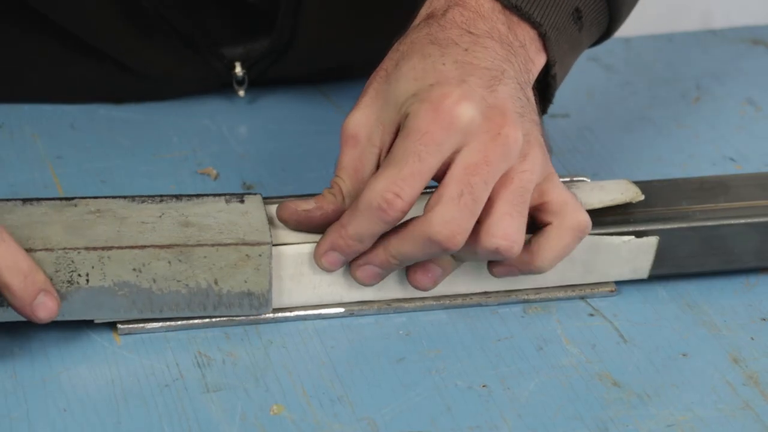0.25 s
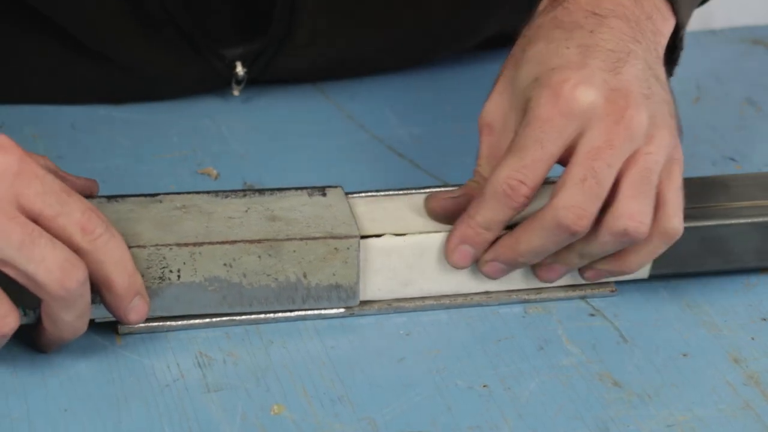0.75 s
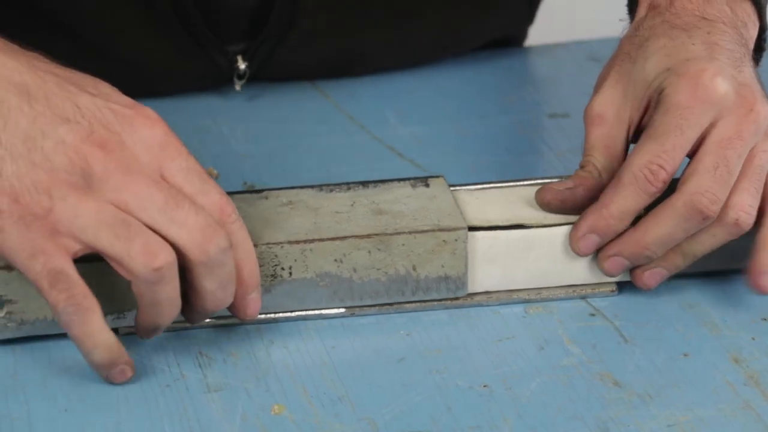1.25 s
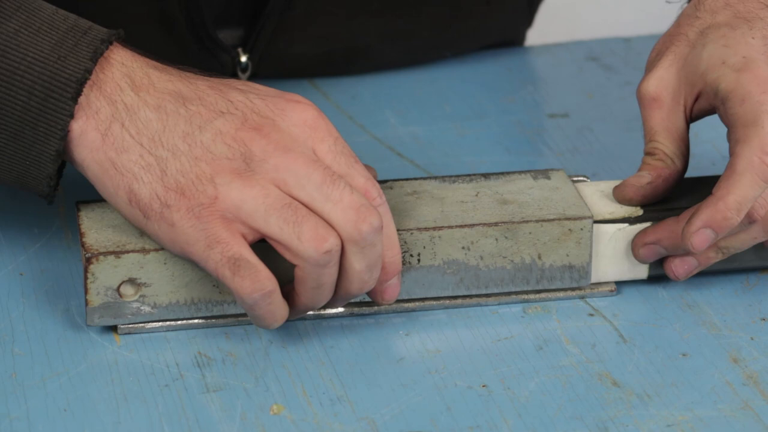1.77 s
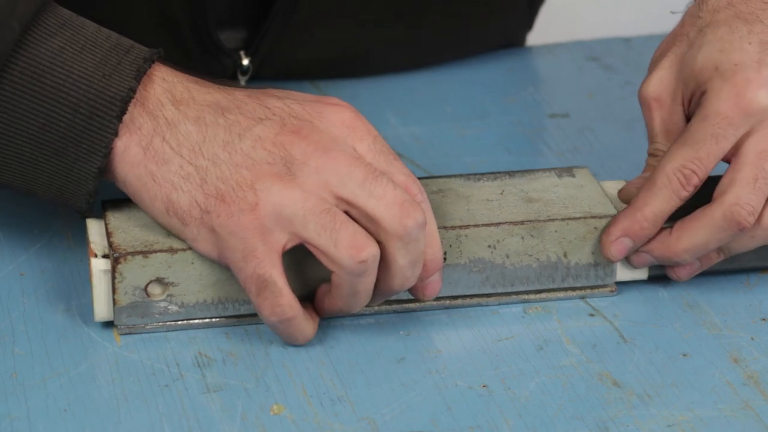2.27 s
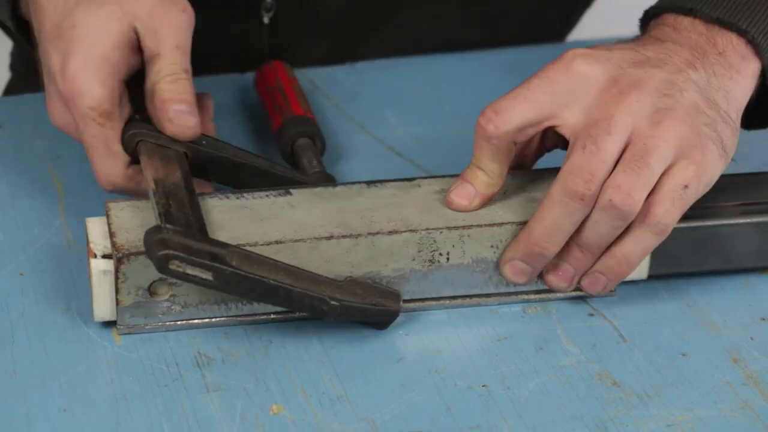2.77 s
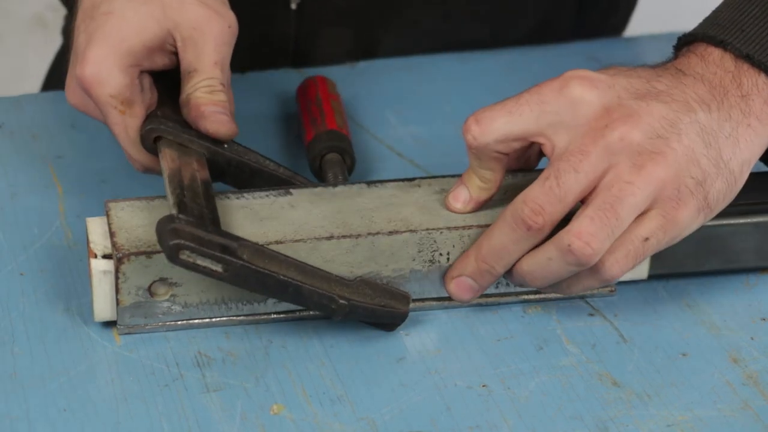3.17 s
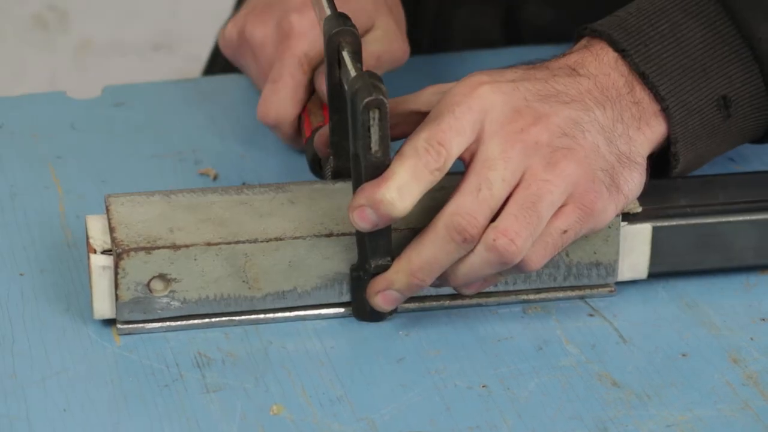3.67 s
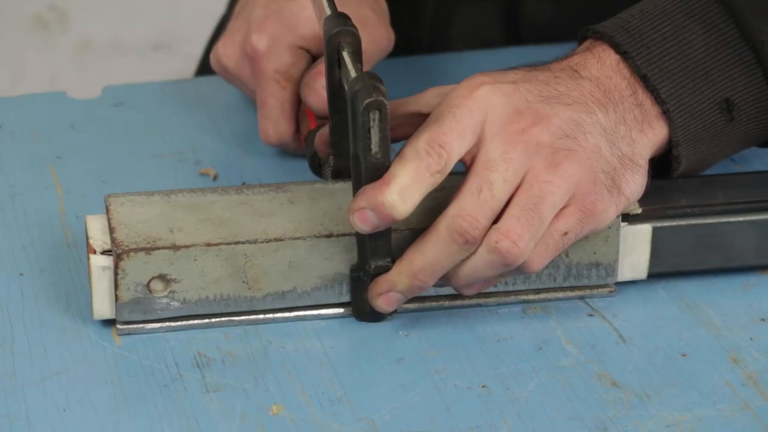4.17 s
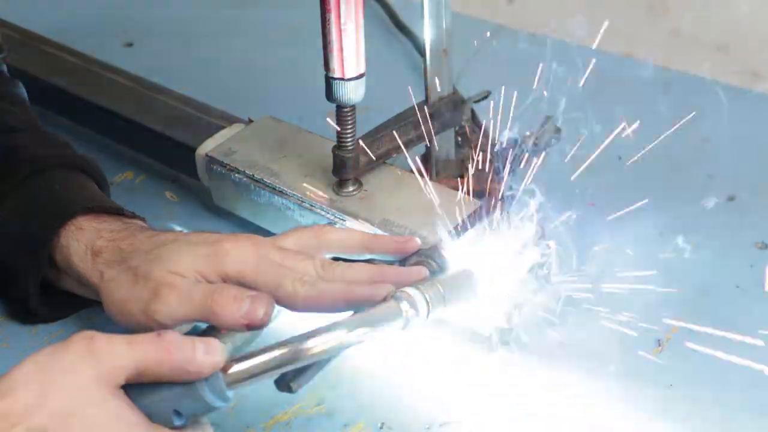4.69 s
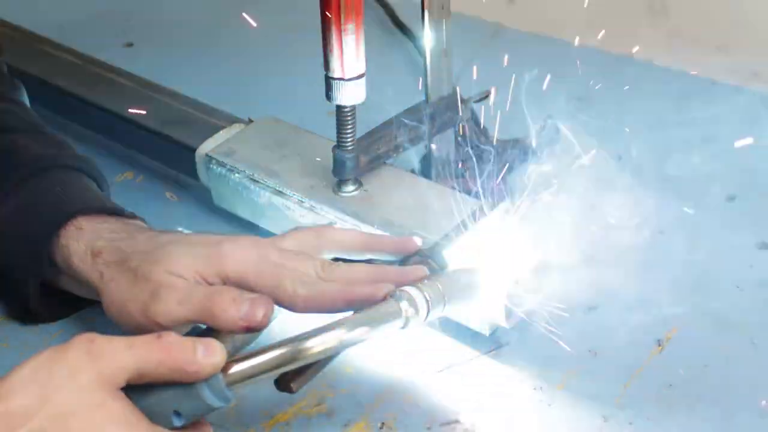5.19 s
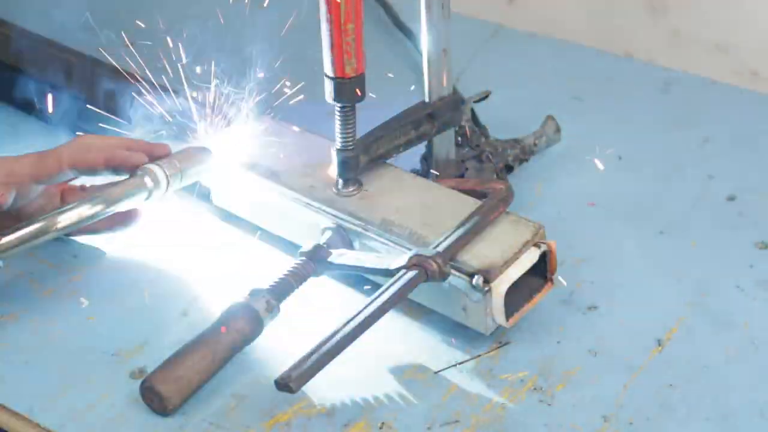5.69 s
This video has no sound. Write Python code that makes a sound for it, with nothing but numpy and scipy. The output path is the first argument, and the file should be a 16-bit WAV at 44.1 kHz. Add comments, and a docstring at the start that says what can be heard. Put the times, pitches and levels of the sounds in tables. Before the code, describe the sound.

A small, hard-walled workshop heard close to the bench, with faint room air and microphone hiss. From 0 s a square steel tube is shoved over a plastic-lined inner tube: a short scrape and soft plastic rubbing, a knock at 0.34, then a stronger juddering scrape at 0.5-0.75 with a rough squeal. Light touches near 0.93 lead to a hard hollow knock at 1.23, and groaning scrapes at 1.2-1.5, with a tiny high squeak. More scrapes at 1.6-1.8 shrink to faint nudges and knocks by 2.3. At 2.8-2.9 a clamp lands with a loud, dry cluster of clacks, another at 3.04, then screw rubbing and dull thuds at 3.15-3.6, softer rubbing at 3.8 and tiny ticks at 4.1-4.25. At 4.37 arc welding bursts in, rapid buzzing snaps and sizzle over a low whirr, popping at 4.58 and 5.26. At 5.33 a second, similar weld takes over and continues to 6 s.

```python
"""A small hard-walled workshop, camera microphone close to a wooden bench, quiet air and hiss throughout.
First a square steel tube is shoved over a plastic-lined inner tube: slips strike its modes, noise rubs.
Blows ring the steel from early on; the edge squeals, the tube groans and corners tink along the way.
Then a screw clamp is knocked on, as struck modes and dry clacks, and tightened, as grains of rubbing.
Last, two tack welds: trains of snaps, spit and sizzle over the whirr and hum of the wire feed."""
import sys
import numpy as np
from scipy import signal
from scipy.fft import rfft, irfft, next_fast_len
from scipy.io import wavfile
from scipy.ndimage import map_coordinates

SR = 44100
rng = np.random.default_rng(int(sys.argv[2]) if len(sys.argv) > 2 else 0)


def bounce(signal):
    """Save signal as a 16-bit WAV file at the path given by the first command-line argument."""
    frames = np.transpose(np.atleast_2d(signal))
    limited = np.clip(frames, -1, 1)
    pcm = np.round(limited * 32767).astype(np.int16)
    wavfile.write(sys.argv[1], SR, pcm)


N = 261954
TIME = np.arange(N) / SR  # seconds
TOP_HZ = 15800  # upper band limit of the camera


def amp(db):
    """Decibels to gain."""
    return 10 ** (np.asarray(db) / 20)


def unit(x):
    """Scale to rms 1."""
    return x / np.sqrt(np.mean(x ** 2) + 1e-20)


def along(points, hz):
    """(Hz, value) points read on a log frequency axis."""
    f, v = np.transpose(points)
    return np.interp(np.log(hz + 1), np.log(f + 1), v)


def during(start, end):
    """1 between two times, with 1 ms edges."""
    return np.clip(np.minimum(TIME - start, end - TIME) * 1000, 0, 1)


def stroke(start, rise, hold, fall):
    """A push builds up, holds, then dies away at fall dB a second."""
    t = TIME - start
    return np.clip(t / max(rise, 1e-3), 0, 1) * amp(-fall * np.maximum(t - rise - hold, 0))


def wobble(rate):
    """A smooth random curve, rate knots a second."""
    return map_coordinates(rng.standard_normal(int(N * rate / SR) + 4), [TIME * rate])


def filtered(x, response):
    """x times a response of frequency."""
    size = x.shape[-1]
    m = next_fast_len(size + 8192)
    return irfft(rfft(x, m) * response(np.fft.rfftfreq(m, 1 / SR)), m)[..., :size]


def convolved(x, response):
    """x through an impulse response."""
    return signal.fftconvolve(x, response)[:N]


def coloured(x, spectrum, size=4096):
    """x through a causal, minimum-phase filter with the given (Hz, dB) shape."""
    shape_db = np.maximum(along(spectrum, np.fft.rfftfreq(size, 1 / SR)), -100)
    cepstrum = irfft(np.log(amp(shape_db)))
    # folding the cepstrum forward in time makes the filter causal
    cepstrum[1:size // 2] *= 2
    cepstrum[size // 2 + 1:] = 0
    return signal.fftconvolve(x, irfft(np.exp(rfft(cepstrum))))[:len(x)]


def band(x, low_hz, high_hz):
    """Causal band-pass."""
    edges = [low_hz, min(high_hz, SR / 2 - 1)]
    return signal.sosfilt(signal.butter(3, edges, 'band', fs=SR, output='sos'), x)


def noise(spectrum):
    """Shaped noise of rms 1."""
    return unit(coloured(rng.standard_normal(N), spectrum))


def pulses(rate, scatter, spread_db, count=6000):
    """Pulses of uneven size and spacing, rate a second, of rms 1."""
    draws = rng.standard_normal((count, 2))
    gaps = np.exp(scatter * draws[:, 0] - scatter ** 2 / 2)  # in mean intervals
    clock = np.cumsum(rate * np.ones(N)) / SR
    at = np.searchsorted(clock, np.cumsum(gaps))
    sizes = amp(spread_db * np.clip(draws[:, 1], -2, 2))
    return unit(np.bincount(at, sizes, N + 1)[:N])


def shifting(x, draw, size=16384, fade='hann'):
    """x through a response drawn afresh every half window, as contacts and paths move."""
    padded, out = np.pad(x, (size // 2, size)), np.zeros(N + 2 * size + 2 * SR)
    window = signal.get_window(fade, size)
    for start in range(0, N + size // 2, size // 2):
        piece = padded[start:start + size] * window
        if piece.any():
            piece = signal.fftconvolve(piece, draw())
            out[start:start + len(piece)] += piece
    return out[size // 2:][:N]


def strike(out, s, x):
    """Add a short sound to out at s seconds."""
    out[round(s * SR):][:len(x)] += x


def cloud(spectrum, t60):
    """A contact's dense, quickly dying overtones, of energy 1."""
    t = np.arange(SR // 4) / SR
    x = coloured(rng.standard_normal(len(t)) * amp(-60 * t / t60), spectrum)
    return x / np.linalg.norm(x)


def ring(modes):
    """Long modes struck once, each with a random sign and about 1 dB of scatter, of energy 1."""
    t = np.arange(SR * 3 // 4) / SR
    x = np.zeros(len(t))
    for hz, db, t60 in modes:
        decay = amp(db + rng.normal(0, 1) - 60 * t / t60) / np.sqrt(t60)
        x += decay * np.sin(2 * np.pi * hz * t) * rng.choice([-1, 1])
    return x / np.linalg.norm(x)


def body(overtones, modes, low_hz, high_hz):
    """One register of a contact: overtones plus long modes, of energy 1."""
    x = band(np.pad(overtones, (0, len(modes) - len(overtones))) + modes, low_hz, high_hz)
    return x / np.linalg.norm(x)


# Likeness of left and right in the diffuse field. Each row: frequency in Hz, likeness from 0 to 1.
LIKENESS = [(100, 1), (2500, 0.97), (4500, 0.92), (8000, 0.33), (14000, 0.3)]


def diffuse(a, b):
    """Two unrelated signals as one diffuse field: alike in the bass, apart in the treble."""
    turn = lambda hz: np.arccos(np.clip(along(LIKENESS, hz), -1, 1)) / 2
    mid = filtered(a, lambda hz: np.cos(turn(hz)))
    side = filtered(b, lambda hz: np.sin(turn(hz)))
    return np.array([mid + side, mid - side])


# Decay of the workshop's tail. Each row: frequency in Hz, t60 in seconds.
ROOM_DECAY = [(150, 1), (500, 1), (2000, 0.68), (6000, 0.91), (14000, 0.19)]


def workshop(x, early_db, tail_db, early_t60):
    """Early reflections from bench and walls, then a tail that dies sooner in the treble."""
    hz, t, _ = signal.stft(np.zeros(SR * 3 // 4), SR, nperseg=256)
    fading = amp(-60 * t / along(ROOM_DECAY, hz)[:, None])

    def answer():
        cells = np.fft.rfft(rng.standard_normal((256, len(t))), axis=0)
        tail = signal.istft(cells * fading, nperseg=256)[1]
        early_decay = amp(-60 * np.arange(len(tail)) / SR / early_t60)
        early = rng.standard_normal(len(tail)) * early_decay
        return (amp(early_db) * unit(early) + amp(tail_db) * unit(tail)) / np.sqrt(len(tail))
    return diffuse(shifting(x, answer, fade='cosine'), shifting(x, answer, fade='cosine'))


# Phase between the microphone ports. Each row: frequency in Hz, lead of the right port in radians.
PORT_LEAD = [(5000, 0), (9000, 1.89), (12000, 2.5), (15000, 3.5)]


def placed(x):
    """The two microphone ports hear direct sound alike in the bass and out of step in the treble."""
    sides = np.array([[-1], [1]])
    return filtered(x, lambda hz: np.exp(.5j * along(PORT_LEAD, hz) * sides))


# Spectrum of the quiet room. Each row: frequency in Hz, level in dB (shape only).
AIR = [(25, -17), (70, -11), (105, 2), (150, -1.5), (600, -1.5), (2400, -23), (15000, -33)]


def room_air():
    """The quiet air of the room, as diffuse shaped noise."""
    return amp(-50.5) * diffuse(noise(AIR), noise(AIR))


# Spectrum of the microphone's own noise. Each row: frequency in Hz, level in dB (shape only).
MIC_HISS = [(100, -4), (600, 7), (3000, -4.5), (15000, -22)]


def mic_hiss():
    """The microphone's own hiss, independent in each channel."""
    return amp(-53.5) * np.array([noise(MIC_HISS), noise(MIC_HISS)])


# Ringing modes of the steel tube. Each row: frequency in Hz, relative level in dB, t60 in seconds.
TUBE_MODES = [(206.5, -11, 0.35), (293.6, -11, 0.52), (311.8, -4, 0.47), (443, -12.5, 0.51),
              (568, -6.5, 0.24), (613, -2, 0.5), (708, -7, 0.13), (749.5, -1.5, 0.086), (795, -6.5, 0.38),
              (1025, -8.5, 0.62), (1100, -9.5, 0.23), (1700, -17, 0.45), (2780, -15, 0.098)]
# Dense scraping overtones of tube and bench. Each row: frequency in Hz, level in dB (shape only).
SCRAPE = [(88, -81), (165, -26), (300, -14), (420, -12), (630, -5), (950, -9.5), (1100, -7), (1350, -15.5),
          (1580, -17.5), (1830, -17), (2300, -23.5), (2800, -27.5), (3700, -34), (4700, -41.5),
          (15000, -60.5)]
# Shoves of the tube. Each row: start in seconds, rise in seconds, hold in seconds, judder drive in dB,
# drive of the steel edge's rasp in dB over the judder, drive of the bench rumble in dB over the judder.
SHOVES = [(0, 0.00051, 0.009, -16.5, -5.5, -2.5), (0.517, 0.016, 0.071, -14.5, -5.5, -9),
          (0.646, 0.0071, 0.0075, -18.5, -5, -7), (1.217, 0.019, 0.05, -18, -6, -3.5),
          (1.366, 0.018, 0.052, -15.5, -3, -10), (1.608, 0.012, 0.027, -23.5, -12, -14),
          (1.679, 0.11, 0.0091, -15, -5, -9), (1.92, 0.02, 0.029, -25, -6, -11.5),
          (2.114, 0.02, 0.0081, -32, -3, -6), (2.249, 0.0029, 0.0039, -41, 5.5, -11.5)]
# Singing of the scraping edge, at little overlap and then deep over the inner tube.
# Each row: frequency in Hz, width in Hz, relative level in dB.
EDGE_SHALLOW = [(1868, 123, 2), (2630, 100, -7.5), (3017, 82, -5.5), (4560, 174, -9), (6500, 67, -15.5),
                (7700, 74, -32)]
EDGE_DEEP = [(1852, 53, 6), (1987, 130, 5), (2293, 55, -3.5), (2613, 77, -6), (4240, 120, -19.5)]
DEEP_FROM_S = 1.1  # shoves from here on sing with the deep set
# dying away after a shove, in dB per second
RUMBLE_FALL, JUDDER_FALL, RASP_FALL, HISS_FALL = 52.4, 92, 159, 350


def edge(x, modes):
    """x through the short resonances of the steel edge, of rms 1."""
    return unit(sum(amp(db) * signal.lfilter(*signal.iirpeak(hz, hz / width, SR), x)
                    for hz, width, db in modes))


def slide():
    """Stick and slip: small slips strike the tube in each shove; brighter registers fade sooner.

    The edge finds other resonances as the tubes overlap further."""
    def effort(levels_db, fall):
        return np.max([amp(db) * stroke(*shove[:3], fall) for db, shove in zip(levels_db, SHOVES)], axis=0)

    def register(level, ring_db, low_hz, high_hz):
        struck = slips * level * (level > amp(-90))
        contact = lambda: body(cloud(SCRAPE, t60=0.042), amp(ring_db) * modes, low_hz, high_hz)
        return shifting(struck, contact, size=4096)

    *_, judder_db, rasp_over_db, bench_over_db = np.transpose(SHOVES)
    rasp_db = judder_db + rasp_over_db
    slips, modes = pulses(rate=380, scatter=.5, spread_db=1.5), ring(TUBE_MODES)
    bench = register(effort(judder_db + bench_over_db, RUMBLE_FALL), ring_db=4.0, low_hz=217.0, high_hz=486)
    judder = register(effort(judder_db, JUDDER_FALL), ring_db=-4.0, low_hz=423, high_hz=1320)
    rasp = amp(-4.0) * register(effort(rasp_db, RASP_FALL), ring_db=1.5, low_hz=1490, high_hz=5500)

    catches = pulses(rate=300, scatter=.5, spread_db=2.0) * rng.choice([-1, 1], N)
    shallow, deep = edge(catches, EDGE_SHALLOW), edge(catches, EDGE_DEEP)
    sing = np.zeros(N)
    for db, shove in zip(rasp_db, SHOVES):
        tone = shallow if shove[0] < DEEP_FROM_S else deep
        sing += amp(db) * stroke(*shove[:3], RASP_FALL) * tone

    flicker = amp(-14 + 0.77 * wobble(150))
    hiss = flicker * unit(band(noise(SCRAPE), 3600, TOP_HZ)) * effort(rasp_db, HISS_FALL)
    return bench + judder + rasp + amp(-3.5) * sing + hiss


# Strokes of the plastic liner and of the hands on it.
# Each row: start in seconds, hold in seconds, level of the hiss in dB.
RUBS = [(0, 0.13, -42.5), (0.198, 0.15, -47), (0.707, 0.081, -42.5), (0.93, 0.035, -41),
        (1.155, 0.061, -40)]
RUB_RISE_S, RUB_FALL = 0.0074, 50  # seconds, dB per second


def liner():
    """The plastic liner rubs with a fine, uneven hiss and stirs the tube a little."""
    level = np.max([amp(db) * stroke(s, RUB_RISE_S, hold, RUB_FALL) for s, hold, db in RUBS], axis=0)
    hiss = unit(band(noise(SCRAPE), 4950, TOP_HZ))
    tube = unit(band(noise(SCRAPE), 1700, 5200))
    return (hiss + amp(-3.0) * tube) * level * amp(1.9 * wobble(88.8))


# Steel knocking on steel and bench. Each row: time in seconds, blow in dB before a common lift,
# thud in dB within the blow, clink in dB within the blow.
KNOCKS = [(0.344, -11, -4, -19.5), (0.937, -23, 6.5, -8), (1.227, -7.5, -9.5, -29), (2.132, -20.5, -3, -15),
          (2.261, -18, -4, -14), (2.666, -24, -2, -35), (2.812, -9, -1.5, -15), (2.849, -6, -5.5, -29),
          (2.883, -7, -5, -35), (3.036, -13.5, -2, -15.5), (3.233, -15.5, -2.5, -11),
          (4.087, -23.5, -3, -31), (4.136, -29.5, -1.5, -2), (4.245, -28, -22, -8)]
# Overtones of a knock. Each row: frequency in Hz, level in dB (shape only).
KNOCK = [(100, -9), (150, -29.5), (220, -8.5), (360, 1.5), (480, -2), (750, 2.5), (1200, -4), (1700, -13),
         (3200, -17.5), (5400, -24.5), (15000, -37)]


def knocks():
    """Each blow thuds in the bench and rings the steel, with its own share of thud, clank and clink."""
    out, modes = np.zeros(N + SR), amp(-5.0) * ring(TUBE_MODES)
    for s, db, thud_db, clink_db in KNOCKS:
        overtones = cloud(KNOCK, t60=0.13)
        thud = amp(thud_db) * body(overtones, modes, 110.0, 374)
        # the clank takes the energy that the thud leaves
        clank_gain = np.sqrt(np.clip(1 - amp(thud_db) ** 2, .05, 1))
        clank = clank_gain * body(overtones, modes, 512, 1840)
        clink = amp(clink_db) * body(overtones, modes, 1750, 11600)
        strike(out, s, amp(db + 14.5) * (thud + clank + clink))
    return out[:N]


# Squeals of the edge. Each row: start in seconds, hold in seconds, frequency in Hz,
# level in dB before roughening.
SQUEALS = [(0.653, 0.07, 1855, -34.5), (1.372, 0.02, 5620, -36.5)]


def squeals():
    """For a moment the edge catches and squeals on one note, rough in phase and level."""
    out = np.zeros(N)
    for s, hold, hz, db in SQUEALS:
        note = np.sin(2 * np.pi * hz * TIME + wobble(170)) * amp(4.9 * wobble(180))
        out += amp(db) * stroke(s, RUB_RISE_S, hold, RASP_FALL) * note
    return out


# Pushes or blows that set the tube groaning. Each row: start in seconds, hold in seconds, drive in dB.
GROANS = [(0.923, 0.02, -28), (1.247, 0.07, -20.5), (1.38, 0.1, -17), (2.84, 0.031, -28)]
# Bending modes of the tube that groan. Each row: frequency in Hz, relative level in dB.
BENDING_MODES = [(569, -7.5), (609, 0.5)]
GROAN_FALL = 150  # dB per second


def groan():
    """The tube's bending modes groan unevenly while they are driven."""
    level = sum(amp(db) * stroke(s, RUB_RISE_S, hold, GROAN_FALL) for s, hold, db in GROANS)
    tones = np.zeros(N)
    for hz, db in BENDING_MODES:
        tones += amp(db + 2.4 * wobble(70)) * np.sin(2 * np.pi * hz * TIME + 0.66 * wobble(44.55))
    return level * tones


# Light touches of steel. Each row: time in seconds, pitch in Hz, energy in dB.
TINKS = [(0.934, 2450, -14), (2.851, 5300, -17), (4.246, 3900, -25.5)]
TINK_T60_S, TINK_SPREAD = 0.028, 0.08  # seconds, reach of the band each side as a share of the pitch


def tinks():
    """Steel corners touch with a tiny, bright ring, made of narrow decaying noise."""
    out, t = np.zeros(N + SR), np.arange(SR // 10) / SR
    for s, hz, db in TINKS:
        burst = rng.standard_normal(len(t)) * amp(-60 * t / TINK_T60_S)
        tink = band(burst, hz / (1 + TINK_SPREAD), hz * (1 + TINK_SPREAD))
        strike(out, s, amp(db) * tink / np.linalg.norm(tink))
    return out[:N]


# Clacks of the clamp's jaw and sliding arm. Each row: time in seconds, energy in dB.
CLACKS = [(2.8133, 4), (2.8205, 5), (2.850, -1), (2.874, -12), (2.885, 4), (2.912, -13), (3.041, -7.5),
          (4.088, -31), (4.247, -22)]
# First instant of a hard contact. Each row: frequency in Hz, level in dB (shape only).
CRACK = [(200, -32), (900, 4.5), (1700, 9), (2800, -7), (5300, -21.5), (15000, -41.5)]
# Dull thuds of the hands striking the clamp. Each row: time in seconds, energy in dB before a band-pass.
THUDS = [(3.233, -4), (3.462, -2.5), (3.506, -3.5), (3.56, -8.5)]
# Modes of clamp and tube together. Each row: frequency in Hz, relative level in dB, t60 in seconds.
CLAMP_MODES = [(295.4, 0.5, 0.18), (336, -1, 0.048), (365, -2.5, 0.17), (451, -9, 0.096)]


def clamp():
    """The clamp lands and rattles with dry clacks; hands strike it with soft, ringing thuds."""
    out = np.zeros(N + SR)
    for s, db in CLACKS:
        strike(out, s, amp(db) * cloud(CRACK, t60=0.019))
    for s, db in THUDS:
        strike(out, s, amp(db) * band(ring(CLAMP_MODES), 97, 980))
    return out[:N]


# Hands bearing down on the clamp. One row: start in seconds, hold in seconds, bench rumble in dB.
GRIP = (2.97, 0.86, -48)
# Turns of the clamp screw. Each row: start in seconds, hold in seconds, level in dB.
TURNS = [(3.155, 0.042, -44.5), (3.775, 0.13, -49)]
# Overtones of the rubbing thread. Each row: frequency in Hz, level in dB (shape only).
THREAD = [(150, -62), (600, 18), (1000, 10.5), (2000, -2.5), (6000, -12), (15000, -36)]
TURN_RISE_S, TURN_FALL = 0.011, 26  # seconds, dB per second


def screw():
    """The clamp's thread rubs in small grains at each turn; the bench rumbles under the hands."""
    push = lambda s, hold, db: amp(db) * stroke(s, TURN_RISE_S, hold, TURN_FALL)
    grains = pulses(rate=720, scatter=0.99, spread_db=4.5)
    turning = grains * sum(push(*turn) for turn in TURNS)
    rub = shifting(turning, lambda: cloud(THREAD, t60=0.033), size=4096)
    bench = lambda: body(cloud(KNOCK, t60=0.14), amp(15.0) * ring(TUBE_MODES), 297, 406)
    rumble = shifting(grains * push(*GRIP), bench, size=4096)
    return rub + rumble


# Strength of the arc. Each row: time in seconds, gain in dB.
HEAT = [(4.73, -4), (4.79, -0.2), (5.36, -2), (5.68, 2.5)]


def burning(start, end):
    """Strength of one arc, which rises once the pool has melted and follows the heat curve."""
    return during(start, end) * amp(np.interp(TIME, *np.transpose(HEAT)))


# Tack welds. Each row: arc struck in seconds, arc out in seconds, crackle in dB before the heat,
# wire feed in dB before the heat, short circuits a second.
TACKS = [(4.371, 5.333, -25, -35, 185), (5.332, 6.0, -27, -32, 195)]
# Spectra of the two crackles. Each row: frequency in Hz, level in dB (shape only).
FIRST_TACK = [(100, -30), (500, -8), (1450, -12), (2200, -7), (2900, -18), (4000, -12.5), (5200, -12.5),
              (6400, -7.5), (8200, -13.5), (12500, -9.5), (15000, -18)]
SECOND_TACK = [(100, -59), (500, -4), (1400, -3.5), (2200, 1), (3200, -4.5), (5200, -5.5), (8200, -8),
               (11700, -5), (15000, -10)]
# Loudest bursts of spatter. Each row: time in seconds, level in dB over an ordinary snap.
POPS = [(4.58, 8), (5.2635, 7.5)]
SPIT_T60_S = .0025


def arc():
    """The wire dips into the pool, shorts and blows free with a snap; spatter sizzles throughout."""
    t = np.arange(SR // 200) / SR
    out = np.zeros(N)
    for (start, end, db, _, dips), spectrum in zip(TACKS, [FIRST_TACK, SECOND_TACK]):
        snaps = pulses(dips, scatter=.17, spread_db=1.5)
        for s, pop_db in POPS:
            snaps[round(s * SR)] = amp(pop_db) * np.sqrt(SR / dips)
        # each snap is a crack and a brief spit of gas
        spit = unit(convolved(snaps, amp(-60 * t / SPIT_T60_S)) * rng.standard_normal(N))
        crack = amp(-3.5) * snaps * rng.choice([-1, 1], N)
        sizzle = amp(-2.5 + wobble(40)) * rng.standard_normal(N)
        out += unit(coloured(crack + spit + sizzle, spectrum)) * amp(db) * burning(start, end)
    return out * amp(0.16 * wobble(37))


# Spectrum of the dull sputter. Each row: frequency in Hz, level in dB (shape only).
SPUTTER = [(35, -40), (100, -16), (700, 0), (2400, -20), (15000, -27)]


def sputter():
    """The first tack also sputters dully, wide to both sides, in opposite polarity."""
    start, end, db, _, _ = TACKS[0]
    spits = unit(coloured(pulses(rate=300, scatter=.8, spread_db=-2.0), SPUTTER))
    return spits * amp(db - 15.0) * burning(start, end) * np.array([[1], [-1]])


# Whirr of the wire feed. Each row: frequency in Hz, level in dB (shape only).
FEEDER = [(65, -52), (110, -19), (240, -7.5), (410, 1.5), (620, -16), (1100, -9.5), (2000, -59)]
# Hum of the wire feed motor. Each row: frequency in Hz, level in dB relative to the whirr.
MOTOR_HUM = [(169.2, -7), (411, -1.5)]


def feeder():
    """The welder's wire feed whirrs and hums, wavering slightly in pitch, while the arc burns."""
    level = sum(amp(db) * burning(start, end) for start, end, _, db, _ in TACKS)
    turning = TIME + np.cumsum(0.0034 * wobble(6.8)) / SR
    hum = sum(amp(db + wobble(13.0)) * np.sin(2 * np.pi * hz * turning) for hz, db in MOTOR_HUM)
    return level * (noise(FEEDER) + hum)


def scene():
    """Fitting, clamping and welding close to the microphone, with the workshop's answer around them."""
    sliding = slide() + liner() + squeals() + groan() + screw()
    blows = knocks() + tinks() + clamp()
    crackle = arc()
    fitting = placed(sliding) + workshop(sliding, early_db=-7.5, tail_db=-10.0, early_t60=0.055)
    clatter = placed(blows) + workshop(blows, early_db=-6.0, tail_db=-2.0, early_t60=0.15)
    welding = placed(crackle) + workshop(crackle, early_db=-2.0, tail_db=-4.5, early_t60=0.095)
    welding *= amp([[-.4], [.4]])  # a little to the right
    return room_air() + mic_hiss() + fitting + clatter + welding + sputter() + feeder()


def record(dry):
    """The camera keeps nothing above its band limit."""
    return filtered(dry, lambda hz: hz < TOP_HZ)


dry = scene()
out = record(dry)
bounce(out)
```